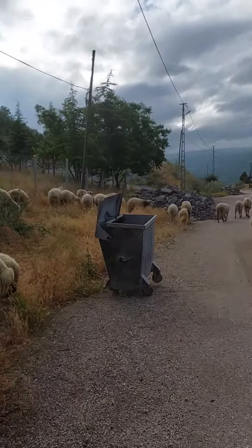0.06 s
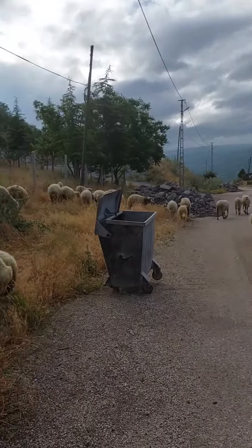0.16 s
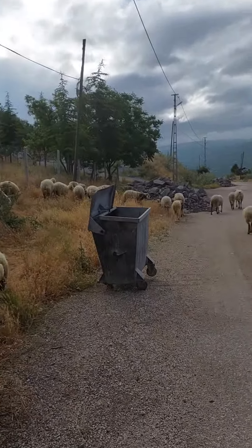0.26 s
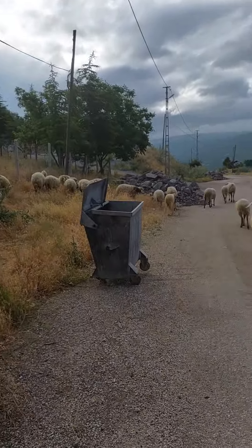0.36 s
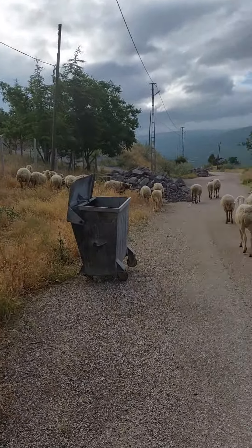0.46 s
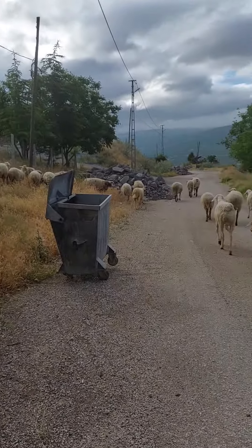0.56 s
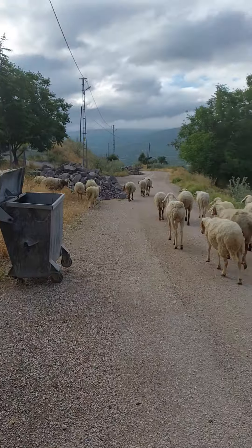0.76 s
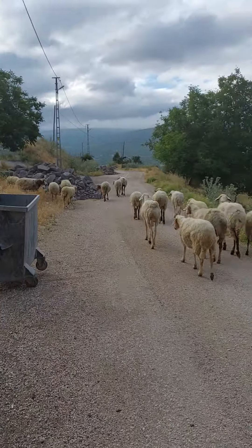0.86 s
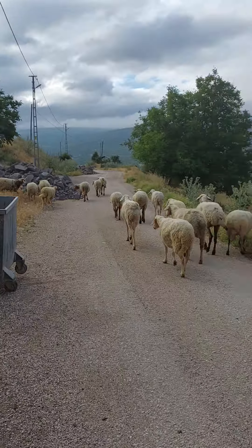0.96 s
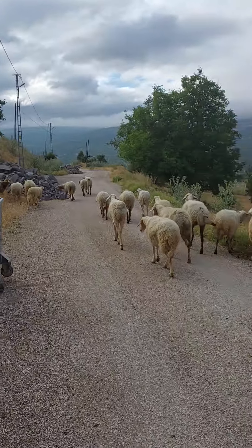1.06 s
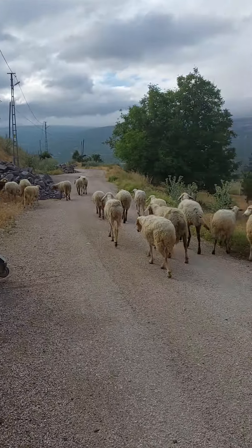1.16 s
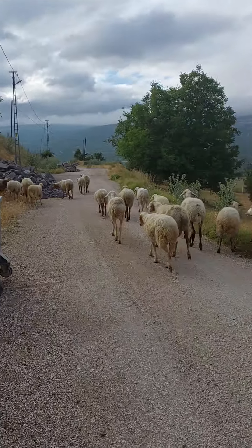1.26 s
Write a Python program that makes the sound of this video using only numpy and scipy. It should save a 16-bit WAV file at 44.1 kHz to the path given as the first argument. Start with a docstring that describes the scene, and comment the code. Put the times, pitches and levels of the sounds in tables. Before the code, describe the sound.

Footsteps crunch on gravel amid shuffling sheep, with wind on the microphone and faint birds.

```python
"""On a breezy hillside, someone walks along a gravel road beside a flock of sheep.
The flock's shuffle is a stream of tiny clicks. Underfoot, stones knock and ring briefly,
gravel crunches in swarms of small knocks, and each foot lands with a soft thud.
Swirls of wind push on the microphone, mostly on its right side, and small birds
chirp in the distance with gliding whistles."""
import sys
import numpy as np
from scipy import signal
from scipy.fft import rfft, irfft
from scipy.io import wavfile
from scipy.ndimage import uniform_filter1d

SR = 44100
rng = np.random.default_rng(int(sys.argv[2]) if len(sys.argv) > 2 else 0)


def unload_wav(signal):
    """Save mono or channel-first audio to the path in sys.argv[1] as 16-bit WAV at rate SR, clipped to [-1, 1]."""
    wavfile.write(
        sys.argv[1],
        SR,
        np.round(np.clip(np.atleast_2d(signal).T, -1, 1) * 32767).astype(np.int16),
    )


N = 57330
T = np.arange(N) / SR

# How loud the ongoing sounds are. Each row: time in seconds, level in dB.
SHUFFLE_LEVEL = [(0, -48), (.045, -50.5), (.09, -57), (.17, -57), (.25, -60), (.3, -75), (.42, -56.5),
                 (.53, -64.5), (.58, -53.5), (.615, -56), (.72, -56.5), (.79, -44.5), (.82, -51.5),
                 (.85, -48.5), (.885, -53.5), (.93, -55), (.98, -56), (1.09, -70), (1.3, -68)]
RUSTLE_LEVEL = [(0, -56.5), (.05, -56.5), (.1, -52), (.15, -59.5), (.29, -60.5), (.42, -60), (.54, -55.5),
                (.62, -56.5), (.71, -55), (.83, -58), (.885, -64), (.905, -56), (.96, -58), (1.1, -63.5),
                (1.21, -56.5), (1.3, -58.5)]
HISS_LEVEL = [(0, -62.5), (.3, -60), (.7, -56.5), (1.05, -60), (1.3, -56)]
BREEZE_LEVEL = [(0, -58), (.11, -58), (.17, -62), (.3, -57), (.45, -93), (.54, -69), (.6, -57),
                (.72, -52.5), (.78, -82), (1, -71), (1.17, -65), (1.3, -64)]
# Each sound's mix of low and high tones. Each row: frequency in Hz, level in dB.
GRAVEL_TONE = [(100, -29), (250, 2), (500, -2), (900, 4), (1500, 2), (2100, -1), (2900, -3), (3700, -7.5),
               (5500, -12), (8000, -52), (12000, -35), (15800, -37), (16400, -40)]
RUSTLE_TONE = [(1500, -16.5), (2800, -1), (3900, 3.5), (5500, 0), (7000, -6.5), (8500, -27), (14000, -10),
               (16400, -61)]
GRIT_TONE = [(2000, -13), (4500, -3), (6500, -1.5), (8400, -23), (11000, -4.5), (15500, 6), (16500, -27)]
AIR_TONE = [(25, -14.5), (70, 6), (130, -1), (260, 0.5), (500, -7.5), (1000, -12), (2000, -31), (4000, -44),
            (8000, -38)]
HISS_TONE = [(500, -9), (2000, 0.5), (3000, -23), (4300, -5), (5500, -18), (7200, -1), (8400, -8),
             (10500, 3), (13000, 5), (15900, 6), (16300, -34)]
BREEZE_TONE = [(20, -13), (45, -3), (75, 6.5), (130, -2.5), (250, -39), (600, -60)]
FLUTTER_TONE = [(40, -3), (110, 18), (200, 3.5), (500, -40), (1200, -39), (4000, -37)]
THUD_TONE = [(60, -19), (130, -9.5), (260, -0.5), (500, -6), (900, -7.5), (2000, -38)]
SCRAPE_TONE = [(1500, -6), (3000, -6.5), (4500, 0), (6500, -3), (8300, -29), (16000, -20)]
# Swirls of wind hitting the microphone. Each row: peak time in seconds, half width in seconds,
# level in dB, swing rate in Hz, left side compared with right in dB.
SWIRLS = [(0.071, 0.0071, -35, 63, -24), (0.099, 0.0082, -51.5, 58.7, 15.5), (.246, 0.02, -29.5, 56.4, -21),
          (0.341, 0.021, -34.5, 68, -39), (.371, 0.0095, -26, 104, -44), (0.384, 0.02, -19.5, 70.8, -60),
          (0.445, 0.013, -23.5, 71.2, -47), (0.48, 0.0074, -24, 78.5, -49), (0.509, 0.013, -27.5, 74, -49),
          (0.603, 0.035, -45.5, 85, -2.5), (0.683, 0.012, -27.5, 60.5, -32), (1.246, 0.029, -57, 58.3, 13)]
# The notes in one stone. Each row: multiple of its pitch, level in dB, cycles to the peak,
# share of the brightness it gets.
STONE_NOTES = [(.25, -9.5, 0.17, 0.08), (1, -1.5, 0.67, 0), (2.2, -13, 1.37, 0.37), (3.2, -23.5, 2.5, 0.82)]
# Stones knocking together. Each row: time in seconds, level in dB, pitch in Hz, brightness in dB,
# ring length as a multiple, left delay in milliseconds.
KNOCKS = [(0.0117, -29, 2080, -17, 1.1, 0.47), (0.0315, -28, 1170, -32, 3, 0.39),
          (0.037, -26.5, 905, -36, 1.5, 0.61), (0.1187, -26, 1960, -5, 0.86, 0.52),
          (0.151, -41, 1650, -19, 1.3, 0.68), (0.162, -33, 1670, -1, 1.3, 0.077),
          (.226, -41.5, 970, -3, 2.9, 0.84), (.388, -36.5, 2200, 7.5, 0.52, 0),
          (0.5018, -35.5, 1920, 17, 0.9, .06), (0.5428, -35.5, 1790, 2, 1.2, 0.07),
          (0.557, -36.5, 970, 6, 1.3, 0.94), (0.6399, -31, 1740, 13.5, 1.9, 0.6),
          (0.6687, -16, 1592, 2, 1.92, 0.57), (0.6814, -37, 1850, 2, 2.2, 0.52),
          (0.7642, -30, 1270, -17, 1.1, 0.41), (0.785, -16, 1510, -12.5, 0.94, 0.56),
          (0.7911, -17.5, 1530, -12, 0.75, 0.52), (0.841, -35, 1600, -26, 1.1, 0.82),
          (0.8558, -33.5, 1900, 7, 1.2, 0.6), (.871, -36, 626, -10, 0.63, 0.24),
          (.9293, -30, 1710, -3, 1.3, 0.49), (.934, -39.5, 925, 7, 4.1, 0.29),
          (0.9447, -38, 1490, -21, 1.3, 0.56), (0.964, -33, 1700, -38, 1.32, 0.58),
          (1.2002, -39.5, 1530, -8, 1.9, 0.53)]
# Gravel giving way. Each row: start in seconds, length in seconds, level in dB, pitch in Hz,
# brightness in dB, left delay in milliseconds.
CRUNCHES = [(0.024, 0.016, -46, 746, 12, 0.52), (0.051, 0.13, -60, 437, -7, 0.25),
            (0.109, 0.004, -45.5, 530, -10, 0.16), (0.115, 0.0062, -49, 1960, -1, 0.46),
            (0.25, 0.023, -58, 990, -21, 0.88), (0.432, 0.025, -54.5, 695, -8, 0.56),
            (0.544, 0.0081, -46, 1860, 17, 0.0083), (0.575, 0.0045, -42, 1620, 12, 0.49),
            (0.585, 0.003, -37, 2260, 12.5, 0.59), (0.641, 0.0088, -47.5, 1710, -2, 0.62),
            (0.896, 0.021, -51.5, 2080, 4, 0.051), (0.918, 0.0078, -49, 1320, -7, 0.63)]
# Feet landing and chips scraping. Each row: start in seconds, length in seconds, level in dB.
THUDS = [(0.03, 0.02, -47), (0.112, 0.0089, -47.5), (0.135, 0.1, -50), (0.225, 0.071, -62),
         (0.572, 0.026, -41.5), (0.706, 0.01, -43), (0.928, 0.018, -53)]
SCRAPES = [(.1605, 0.0029, -44), (0.3095, 0.0028, -49.5), (0.5433, 0.0073, -50.5), (0.588, 0.0031, -46),
           (0.675, 0.0025, -49), (0.892, 0.015, -43), (0.954, 0.0018, -50.5), (0.961, 0.0023, -48.5)]
# Fine grit snapping. Each row: time in seconds, level in dB.
SNAPS = [(0.0304, -33.5), (.036, -29), (0.1169, -23), (0.211, -38), (.6465, -30)]
# A firm step's hollow notes. Each row: time in seconds, level in dB, pitch in Hz, cycles to the peak.
HOLLOW_NOTES = [(.0315, -34, 820, 3.8), (0.0338, -38.5, 1320, 4), (0.041, -43.5, 251, 1.17)]
# Three bird calls. Each row: time in seconds, pitch in Hz, level in dB.
FIRST_CALL = [(.452, 3884, -66), (.462, 3726, -49), (.472, 3610, -55), (.479, 3656, -46), (.486, 3490, -44),
              (.497, 3500, -52.5), (.518, 3450, -62)]
FAINT_CALL = [(1.18, 3740, -58), (1.203, 3850, -58), (1.217, 3650, -58), (1.228, 3300, -59),
              (1.244, 2960, -58), (1.26, 3080, -60)]
HIGH_CALL = [(1.233, 5000, -59), (1.242, 5410, -48), (1.25, 4940, -50), (1.257, 4600, -40),
             (1.264, 4580, -50), (1.269, 4890, -48), (1.273, 4580, -42), (1.279, 4560, -70),
             (1.286, 4300, -54), (1.291, 4600, -55)]

LEFT_DELAY_MS, KNOCK_LEFT_DB, GRAVEL_LEFT_DB = 0.526, -3, -3.5


def amp(db):
    """Turns decibels into a number to multiply by."""
    return 10 ** (np.asarray(db) / 20)


def unit(x):
    """Scales a sound to an average strength (rms) of 1."""
    return x / np.sqrt(np.mean(x ** 2) + 1e-20)


def level(points):
    """Volume over time from rows of seconds and dB."""
    return amp(np.interp(T, *np.transpose(points)))


def colour(x, tone):
    """Turns frequencies up or down, following rows of Hz and dB."""
    f, db = np.transpose(tone)
    hz = np.fft.rfftfreq(N, 1 / SR)
    return irfft(rfft(x) * amp(np.interp(np.log(hz + 1), np.log(f), db)), N)


def noise(tone):
    """Noise of strength 1 with the given tone."""
    return unit(colour(rng.standard_normal(N), tone))


def wander(samples):
    """A random drift, smoothed over that many samples."""
    return unit(uniform_filter1d(uniform_filter1d(rng.standard_normal(N), samples), samples))


def stereo(x, delay_ms, left_db):
    """Makes a left and right pair; the left gets its own delay and level."""
    delay = np.exp(-2j * np.pi * np.fft.rfftfreq(N, 1 / SR) * delay_ms / 1000)
    return np.array([amp(left_db) * irfft(rfft(x) * delay, N), x])


def burst(start, length):
    """A volume curve with a quick rise and a slower fall."""
    age = np.clip((T - start) / length * 4, 0, 50)
    return age * np.exp(1 - age)


def ring(t, hz, cycles):
    """A note that swells and dies within a few cycles, strongest at t = 0."""
    age = np.clip(1 + t * hz / cycles, 0, 30)
    return -(age * np.exp(1 - age)) ** 3 * np.sin(2 * np.pi * hz * t)


def clicks(per_s, spread_db):
    """Random clicks of uneven size."""
    size = amp(spread_db * np.minimum(rng.exponential(1, N), 4))
    return size * rng.choice([-1, 1], N) * (rng.random(N) < per_s / SR)


def echoes(x, fade_s):
    """A blur of echoes, one for each side, falling 60 dB in fade_s."""
    t = T[:SR // 3]
    fade = amp(-60 * t / fade_s)
    tails = [unit(rng.standard_normal(len(t)) * fade) / np.sqrt(len(t)) for side in range(2)]
    return np.array([signal.fftconvolve(x, tail)[:N] for tail in tails])


def shuffle():
    """The flock shifts the gravel: close clicks, a far wash and a high rustle all around."""
    near = unit(colour(clicks(per_s=1300, spread_db=3.2), GRAVEL_TONE))
    near = stereo(near, LEFT_DELAY_MS, GRAVEL_LEFT_DB)
    far = np.array([noise(GRAVEL_TONE), noise(GRAVEL_TONE)])
    rustle = np.array([unit(colour(clicks(per_s=8700, spread_db=4), RUSTLE_TONE)) for side in range(2)])
    return level(SHUFFLE_LEVEL) * (near + 0.48 * far) + level(RUSTLE_LEVEL) * rustle


def grit():
    """Fine grit ticks faintly throughout."""
    ticks = unit(colour(clicks(per_s=300, spread_db=2.5), GRIT_TONE))
    return stereo(amp(-66) * ticks, delay_ms=0.017, left_db=2.5)


def air():
    """A low wash of outdoor air and the microphone's hiss, both softer on the left."""
    shared = 0.89  # part of the wash's power common to both sides
    wash = np.sqrt(shared) * noise(AIR_TONE)
    wash = wash + np.sqrt(1 - shared) * np.array([noise(AIR_TONE), noise(AIR_TONE)])
    hiss = level(HISS_LEVEL) * np.array([noise(HISS_TONE), noise(HISS_TONE)])
    return amp(-57.5) * wash * amp([[-5], [0]]) + hiss * amp([[-4], [0]])


def wind():
    """Over a low breeze, each swirl briefly swings the air pressure back and forth."""
    out = level(BREEZE_LEVEL) * np.array([noise(BREEZE_TONE), noise(BREEZE_TONE)])
    for peak, width, db, hz, left_db in SWIRLS:
        cycles = np.cumsum(hz * (1 + 0.18 * wander(samples=300))) / SR
        swing = np.cos(2 * np.pi * (cycles - np.interp(peak, T, cycles)))
        flutter = amp(-20) * noise(FLUTTER_TONE)
        swell = amp(db) * np.exp(-((T - peak) / width) ** 2)
        out = out - stereo(swell * (swing + flutter), 0, left_db)
    return out


def low_cut(x):
    """The microphone weakens the wind's deep rumble, most near 32 Hz."""
    return np.array([colour(side, [(20, -1), (32, -8.5), (46, 1.0), (100, -0.5)]) for side in x])


def stone(t, hz, bright_db, ring_length):
    """A struck stone rings with a few short notes and a sharp tick."""
    body = sum(amp(db + share * bright_db) * ring(t, hz * multiple, cycles * ring_length)
               for multiple, db, cycles, share in STONE_NOTES)
    tick = amp(bright_db - 15) * ring(t, hz=12300, cycles=1)
    return body + tick


def knocks():
    """Single stones knock together underfoot."""
    return sum(stereo(amp(db) * stone(T - time, hz, bright_db, ring_length), delay_ms, KNOCK_LEFT_DB)
               for time, db, hz, bright_db, ring_length, delay_ms in KNOCKS)


def crunches():
    """Gravel gives way under a foot: a swarm of knocks from stones of three sizes."""
    out = 0
    for start, length, db, hz, bright_db, delay_ms in CRUNCHES:
        swarm = 0
        for multiple in (0.8, 0.95, 1.1):
            hits = clicks(per_s=3700 / 3, spread_db=3.5)
            knock = stone(T[:400] - T[200], hz * multiple, bright_db, ring_length=1)
            swarm = swarm + signal.fftconvolve(hits, knock, "same")
        crunch = unit(swarm * burst(start, length)) * np.sqrt(length / T[-1])
        out = out + stereo(amp(db) * crunch, delay_ms, GRAVEL_LEFT_DB)
    return out


def thuds():
    """A foot's weight lands as a dull puff of noise."""
    puffs = sum(amp(db) * burst(start, length) * noise(THUD_TONE) for start, length, db in THUDS)
    return stereo(puffs, LEFT_DELAY_MS, left_db=-2.5)


def snaps():
    """Bits of grit snap with a tiny, very high ring."""
    ticks = sum(amp(db) * ring(T - time, hz=14000, cycles=1.8) for time, db in SNAPS)
    return stereo(ticks, delay_ms=0, left_db=-14.5)


def hollow_step():
    """A firm step sets off a short, hollow ring."""
    notes = sum(amp(db) * ring(T - time, hz, cycles) for time, db, hz, cycles in HOLLOW_NOTES)
    return stereo(notes, LEFT_DELAY_MS, KNOCK_LEFT_DB)


def scrapes():
    """Stone chips scratch over each other for a few milliseconds."""
    chips = sum(amp(db) * burst(start, length) * noise(SCRAPE_TONE) for start, length, db in SCRAPES)
    return stereo(chips, delay_ms=0.032, left_db=-1)


def bird(call, right_db):
    """A gliding, fluttering whistle, scattered by the trees."""
    times, hz, db = np.transpose(call)
    pitch = np.interp(T, times, hz) * (1 + 0.021 * wander(samples=50))
    flutter = amp(2 * wander(samples=150))
    song = np.interp(T, times, amp(db), 0, 0) * flutter * np.sin(2 * np.pi * np.cumsum(pitch) / SR)
    direct = stereo(song, delay_ms=-0.084, left_db=-1.5)
    return (direct + amp(-5) * echoes(song, fade_s=0.11)) * amp([[0], [right_db]])


def scene():
    """Mixes the steps and their echoes off the ground with the flock, wind, birds and air."""
    steps = knocks() + crunches() + thuds() + snaps() + hollow_step() + scrapes()
    steps = steps + amp(-13) * echoes(steps[1], fade_s=0.082)
    nearby = steps + shuffle() + grit() + low_cut(wind())
    birds = bird(FIRST_CALL, -4.5) + bird(FAINT_CALL, -3.5) + bird(HIGH_CALL, -3.5)
    return nearby + birds + air()


def record(dry):
    """Removes the highest treble, above 16300 Hz."""
    low_pass = signal.firwin(301, 16300, window=("kaiser", 9), fs=SR)
    return signal.oaconvolve(dry, low_pass[None], "same")


dry = scene()
out = record(dry)
unload_wav(out)
```